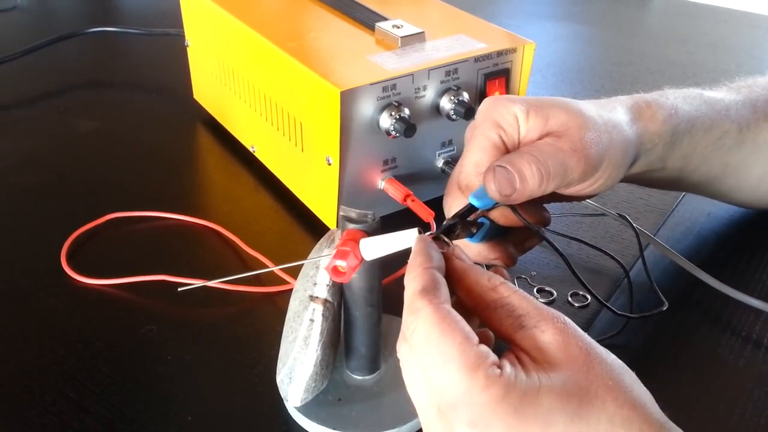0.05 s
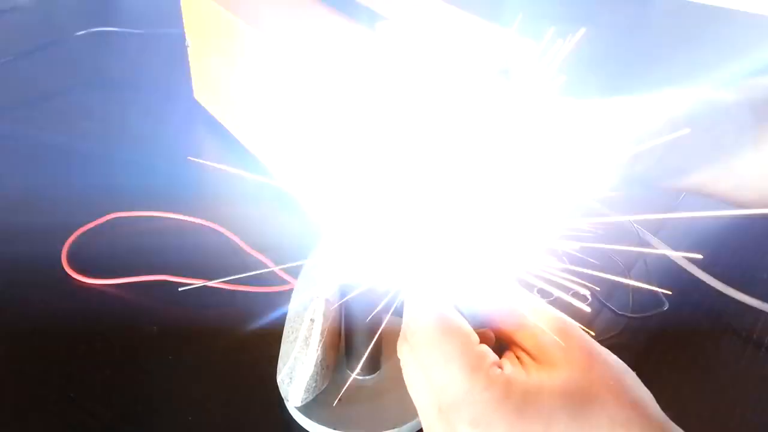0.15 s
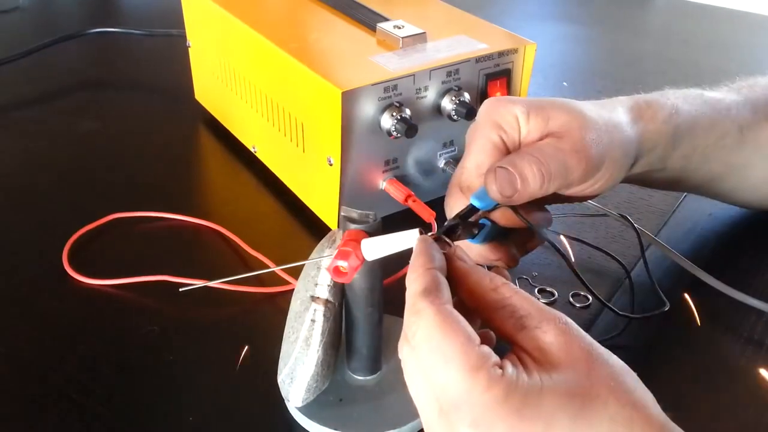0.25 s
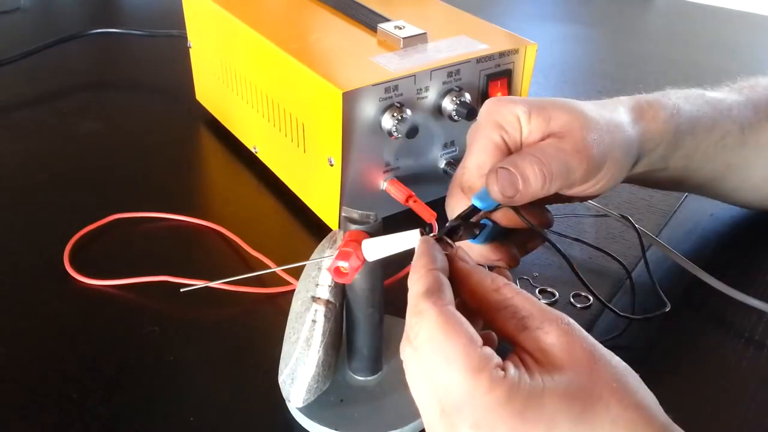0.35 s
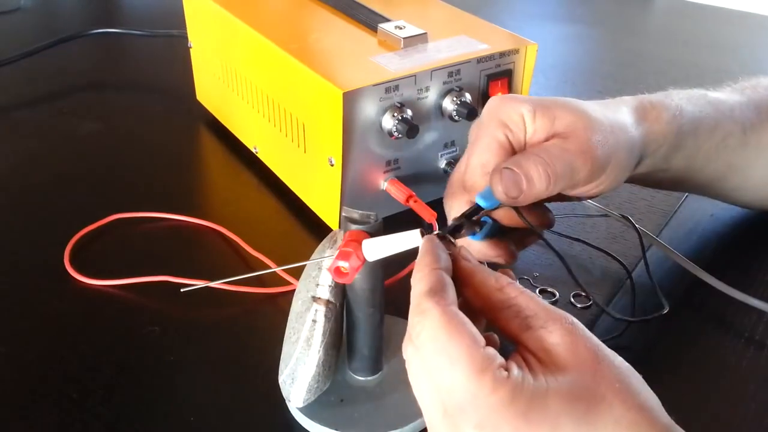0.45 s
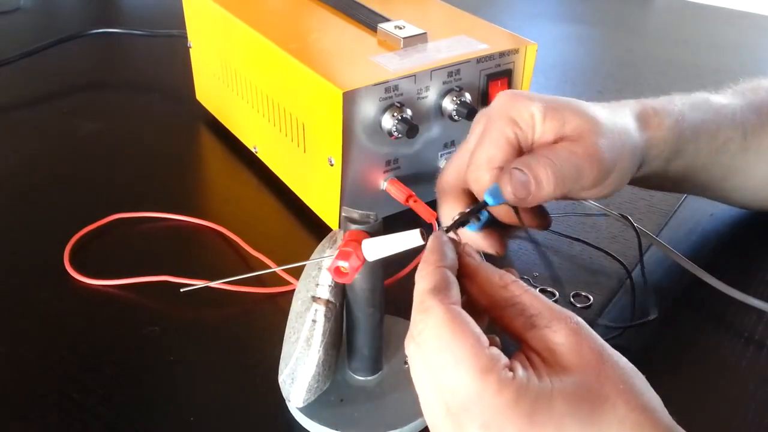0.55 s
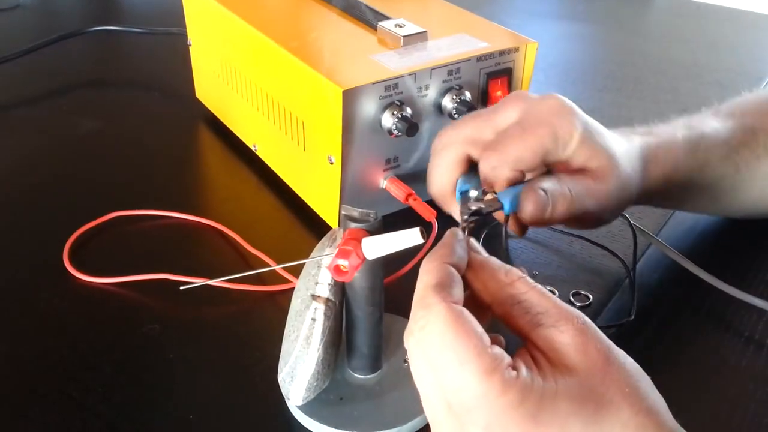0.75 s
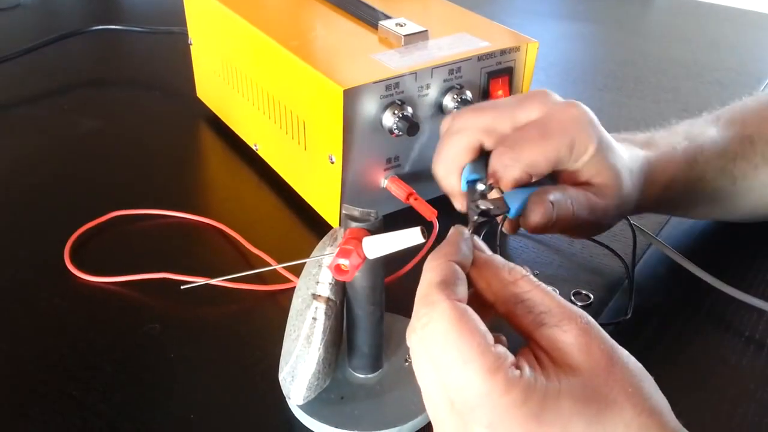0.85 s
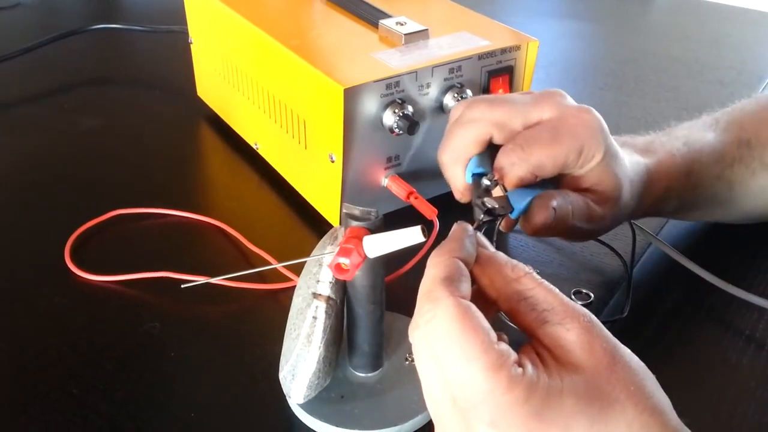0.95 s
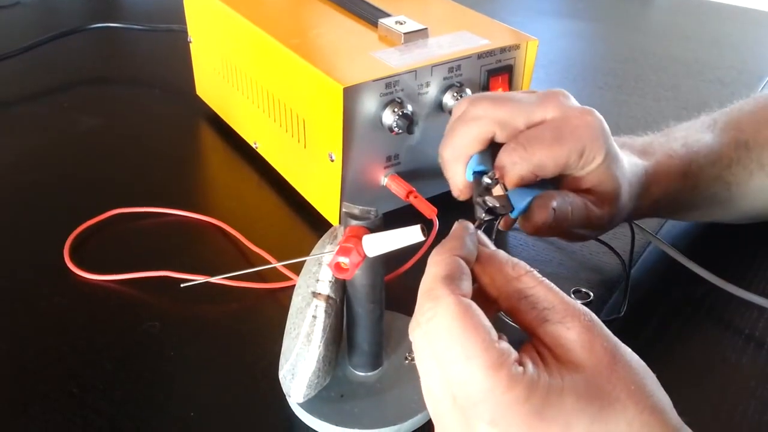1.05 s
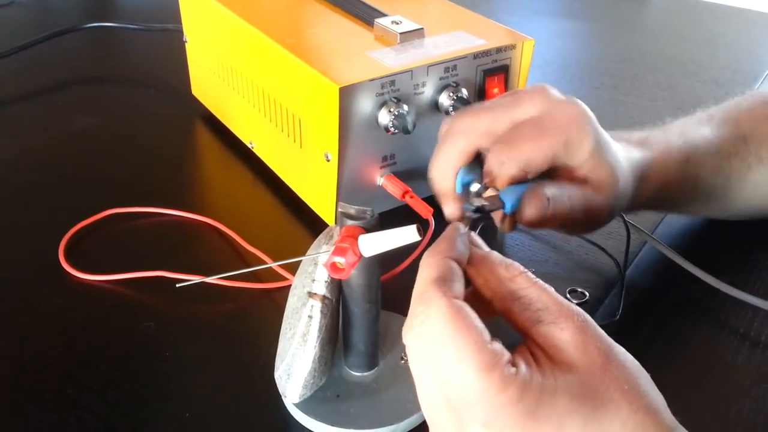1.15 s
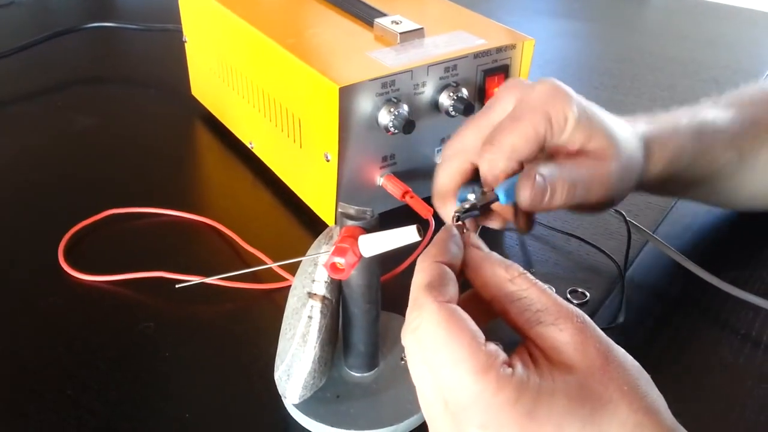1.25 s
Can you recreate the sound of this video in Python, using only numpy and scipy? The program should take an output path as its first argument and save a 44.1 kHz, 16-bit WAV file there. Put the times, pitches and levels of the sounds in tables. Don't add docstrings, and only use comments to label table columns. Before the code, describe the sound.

A small electric welder fires once: at 0.22 seconds a hard, bright, overloaded crack rings its steel case and thuds the table, with a brief wall slap and room tail. At 0.4 its relay clacks. Sound ducks and hiss swells, easing by 0.8. Very faint tap and plier tick come near 1.0. Fan rumble stays right; thin 30-per-second buzz and hiss stay left, until about 1.3.

```python
import sys
import numpy as np
from scipy import signal
from scipy.fft import rfft, irfft, next_fast_len
from scipy.io import wavfile
from scipy.ndimage import map_coordinates

SR = 44100
rng = np.random.default_rng(int(sys.argv[2]) if len(sys.argv) > 2 else 0)


def waveform_to_disk(signal):
    frames = np.transpose(np.atleast_2d(signal))
    scaled = np.clip(frames, -1, 1) * 32767
    samples = np.round(scaled).astype(np.int16)
    wavfile.write(sys.argv[1], SR, samples)


N = 57330


def arc():
    # t/s, peak level/dB, rise/s, hold/s, T60/s
    crack_bursts = [
        (.2185, -27.5, 0.0036, .0005, .01),
        (.2229, 0.5, .0006, 0.0016, 0.023),
    ]
    # f/Hz, width/Hz, level/dB
    case_modes = [(1400, 370, -13.5), (2200, 210, -14), (3130, 270, -5.5), (3874, 275, 1), (4572, 120, 2),
                  (5385, 235, -1), (5993, 150, -4.5), (6480, 760, -9), (7750, 300, -15.5), (8982, 200, -7),
                  (11340, 790, -16.5), (13250, 970, -27.5)]
    # f/Hz, width/Hz, level/dB
    air_bands = [(387, 200, 6), (1500, 880, -2.5), (5300, 8100, -8), (11500, 1300, -23)]
    case_ring = shop(struck(crack_bursts, case_modes), wet_db=-10.5)
    air_crack = shop(struck(crack_bursts, air_bands), wet_db=-2.5)
    return case_ring + amp(-10) * air_crack


def table_thud():
    # t/s, peak level/dB, rise/s, hold/s, T60/s
    pushes = [
        (.2229, 2, .0002, .0002, .002),
        (.2268, -9.5, .0002, .0002, .002),
    ]
    # f/Hz, width/Hz, level/dB
    table_modes = [(362.7, 130, 0), (547, 48, -7.5), (745, 120, 4.5), (1000, 200, -0.5)]
    thud = amp(-18.5) * struck(pushes, table_modes, noisy=False)
    return shop(thud, wet_db=-1.5)


def wall_slap():
    # t/s, peak level/dB, rise/s, hold/s, T60/s
    echoes = [
        (.2555, -20, .003, .006, .02),
        (.2445, -30, .002, .008, .03),
    ]
    # f/Hz, width/Hz, level/dB
    slap_bands = [(752, 99, -7), (3973, 900, -1), (4600, 600, -6.5)]
    return struck(echoes, slap_bands)


def relay():
    # t/s, peak level/dB, rise/s, hold/s, T60/s
    parting = [
        (.3955, -32, 0.0018, 0.0022, .008),
        (.3992, -23.5, .0002, .0006, .006),
    ]
    # f/Hz, width/Hz, level/dB
    contact_modes = [(4822, 2800, -2.5), (7847, 900, -5), (10300, 900, 2), (13490, 1500, -7.5)]
    # t/s, peak level/dB, rise/s, hold/s, T60/s
    drop_out = [
        (.3992, -17, 0.00027, 0.0013, 0.0094),
        (.4018, -18.5, .0008, 0.0022, 0.052),
    ]
    # f/Hz, width/Hz, level/dB
    relay_modes = [(531.5, 130, 5.5), (905, 220, 3), (1160, 200, 0), (1414, 240, -3), (2070, 640, -5),
                   (3310, 500, -5.5), (3880, 300, -2.5), (4854, 1200, -6), (5370, 440, -3.5),
                   (7610, 900, -13.5), (10990, 6000, -22)]
    # t/s, peak level/dB, rise/s, hold/s, T60/s
    rebound = [
        (.4005, -32, .001, .006, .04),
        (.4175, -33, .001, .008, .025),
    ]
    # f/Hz, width/Hz, level/dB
    frame_modes = [(555, 170, -5.5), (790, 200, -1), (1181, 400, -9.5)]
    clack = struck(drop_out, relay_modes) + struck(rebound, frame_modes)
    click = struck(parting, contact_modes)
    return shop(clack, wet_db=-6.5) + shop(click, wet_db=-18.5)


def handling():
    # t/s, peak level/dB, rise/s, hold/s, T60/s
    jaw_tick = [
        (1.0711, -46, .0002, .0006, .006),
    ]
    # f/Hz, width/Hz, level/dB
    jaw_modes = [(2500, 1500, -12), (4900, 1600, 0), (8500, 1000, 2)]
    # t/s, peak level/dB, rise/s, hold/s, T60/s
    finger_tap = [
        (1.0142, -31, .0002, .0002, .002),
    ]
    # f/Hz, width/Hz, level/dB
    stand_mode = [(720, 128, 0)]
    tap = amp(-22.5) * struck(finger_tap, stand_mode, noisy=False)
    return shop(struck(jaw_tick, jaw_modes) + tap, wet_db=-18.5)


def struck(bursts, modes, noisy=True):
    t = np.arange(N) / SR
    envelope = np.zeros(N)
    for start, db, rise, hold, t60 in bursts:
        decay_time = np.clip(t - start - rise - hold, 0, None)
        envelope += np.clip((t - start) / rise, 0, 1) * amp(db - 60 * decay_time / t60)

    def ring(f):
        total = 0
        for k, (centre, width, db) in enumerate(modes):
            resonance = 1j * f * width / (centre * centre - f * f + 1j * f * width)
            total = total + (-1) ** k * amp(db) * resonance
        return total

    scale = np.sqrt(np.mean(np.abs(ring(np.linspace(0, SR / 2, num=2000))) ** 2))
    drive = envelope * (rng.standard_normal(N) if noisy else 1)
    return filtered(drive, ring) / scale


def shop(x, wet_db):
    # f/Hz, T60/s
    reverb_times = [(200, .7), (700, 0.56), (2000, 0.71), (4000, 0.6), (8000, .55), (14000, 0.25)]
    first_wall_s = .008
    hz, t, z = signal.stft(rng.standard_normal(SR), SR, nperseg=256)
    decay = amp(-60 * t / along(reverb_times, hz)[:, None])
    tail = signal.istft(z * decay, SR, nperseg=256)[1]
    tail = np.pad(tail / np.linalg.norm(tail), (int(first_wall_s * SR), 0))
    return x + amp(wet_db) * signal.fftconvolve(x, tail)[:N]


def fan():
    # f/Hz, level/dB per Hz
    fan_spectrum = [(25, -16.5), (80, -0.5), (140, 3.5), (300, -7), (800, -16), (2000, -22.5),
                    (5000, -53.5)]
    lumps = map_coordinates(rng.standard_normal(60), [np.arange(N) * 25 / SR])
    return amp(-56.5 + 1.5 * lumps) * noise(fan_spectrum)


def frame_buzz():
    # t/s into the frame, relative size, scatter/s, ramp/s
    current_steps = [
        (.0035, .2, .0003, .0004),
        (.0073, .52, .00004, .0001),
        (.0077, -.9, .00006, .001),
        (.0088, .75, .00015, .0003),
        (.0124, -.45, .0002, .0007),
        (.0134, .25, .0003, .0012),
        (.0175, -.32, .0005, .0015),
        (.0193, .2, .0005, .002),
    ]
    frame_hz, step_vary = 30, .18
    supply_hz, supply_damp, smooth_hz = 110, .55, 5000
    blip_s, blip_from_s, blip_to_s = .00022, .008, .017
    frames = np.arange(int(N / SR * frame_hz) + 1) / frame_hz
    edges = np.zeros(N)
    for at, size, scatter, ramp in current_steps:
        late, vary = rng.standard_normal((len(frames), 2)).T
        places = ((frames + at + scatter * late) * SR).astype(int)
        impulses = np.bincount(places, size * (1 + step_vary * vary), N + SR)
        width = max(int(ramp * SR), 1)
        edges += np.convolve(impulses, np.ones(width) / width)[:N]

    def leak(f):
        supply = supply_hz ** 2 - f * f + 2j * supply_damp * f * supply_hz
        return (1j * f) * SR / (2 * np.pi) / supply / (1 + 1j * f / smooth_hz)

    place, depth = rng.random((len(frames), 2)).T
    start = frames + blip_from_s + (blip_to_s - blip_from_s) * place
    dips = np.bincount((start * SR).astype(int), depth, N + SR)[:N]
    blips = -np.convolve(dips, np.hanning(int(2 * blip_s * SR)))[:N]
    ripple = np.cos(2 * np.pi * 60 * (np.arange(N) / SR - .0083))
    return amp(-42.5) * filtered(edges, leak) + amp(-48) * blips + amp(-63) * ripple


def input_hiss():
    # f/Hz, level/dB per Hz
    hiss_spectrum = [(25, -13), (100, 16.5), (400, 3), (2500, -0.5), (5000, -7), (14000, -6.5)]
    return amp(-65.5) * noise(hiss_spectrum)


def microphone_hiss():
    # f/Hz, level/dB per Hz
    air_spectrum = [(25, -30.5), (300, 5), (1200, -0.5), (3000, -0.5), (7000, -6.5), (14000, -3.5)]
    return amp(-64) * noise(air_spectrum)


def noise(spectrum):
    return unit(filtered(rng.standard_normal(N), lambda hz: amp(along(spectrum, hz))))


def gain_control():
    # t/s, sound level/dB, amplifier noise level/dB
    gain_points = [
        (0, -3, 1),
        (0.228, -2, 0),
        (0.238, -8, 8),
        (0.312, -6, 9),
        (0.498, -4.5, 8),
        (.6, -5, 6.5),
        (.68, -5, 2.5),
        (0.799, -1, 1.5),
        (1.3, -1.5, 1),
    ]
    s, duck_db, rise_db = np.transpose(gain_points)
    t = np.arange(N) / SR
    return amp(np.interp(t, s, duck_db)), amp(np.interp(t, s, rise_db))


def overloaded(x):
    clip, hardness, mic_hz = 1.1, 4, 150
    limited = x / (1 + np.abs(x / clip) ** hardness) ** (1 / hardness)
    return filtered(limited, lambda f: (1j * f / (mic_hz + 1j * f)) ** 4)


def unit(x):
    return x / np.sqrt(np.mean(x ** 2) + 1e-20)


def along(points, hz):
    f, v = np.transpose(points)
    return np.interp(np.log(hz + 1), np.log(f + 1), v)


def filtered(x, response):
    m = next_fast_len(N + SR // 2)
    return irfft(rfft(x, m) * response(np.fft.rfftfreq(m, 1 / SR)), m)[..., :N]


def amp(db):
    return 10 ** (np.asarray(db) / 20)


def scene():
    duck, rise = gain_control()
    near = overloaded(arc() + table_thud() + wall_slap() + relay() + handling())
    input_hz = 28
    electrical = frame_buzz() + input_hiss()
    left = rise * filtered(electrical, lambda f: (1j * f / (input_hz + 1j * f)) ** 2)
    right = duck * (near + fan()) + rise * microphone_hiss()
    return np.array([left, right])


def record(dry):
    starve_hz, starve_db, attack_db = 9500, -18, -22
    top_hz, above_db, edge_hz = 14650, -36.5, 15900
    hz, _, z = signal.stft(dry, SR, nperseg=1024)
    power = np.abs(z) ** 2
    bands = power[:, :-1].reshape(2, -1, 8, z.shape[-1]).mean(axis=2)
    bands = np.repeat(bands, 8, axis=1)
    quiet = bands < amp(2 * starve_db) * power.mean(axis=1, keepdims=True)
    weak = quiet & (hz[:-1, None] > starve_hz)
    calm = power.sum(axis=1, keepdims=True) < amp(2 * attack_db)
    kept = np.concatenate([z[:, :-1] * ~(weak & calm), z[:, -1:]], axis=1)
    x = signal.istft(kept, SR, nperseg=1024)[1][:, :N]
    x = filtered(x, lambda f: np.where(f < top_hz, 1, amp(above_db)) * (f < edge_hz))
    return x / np.maximum(np.abs(x).max(axis=1, keepdims=True), 1)


dry = scene()
out = record(dry)
waveform_to_disk(out)
```